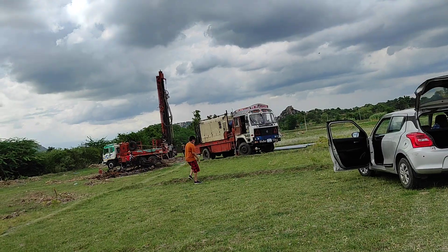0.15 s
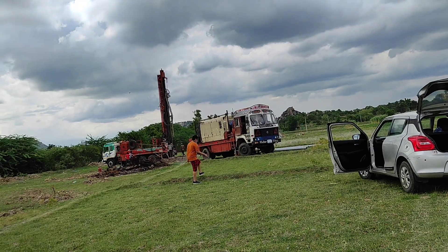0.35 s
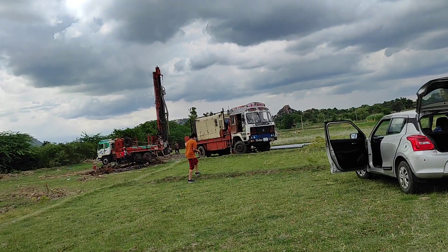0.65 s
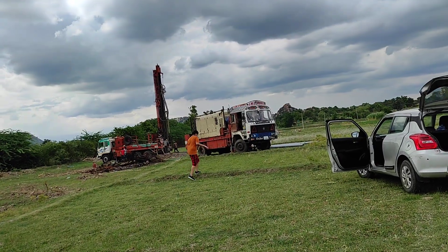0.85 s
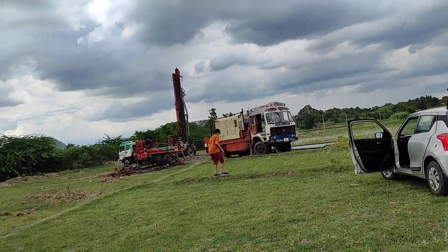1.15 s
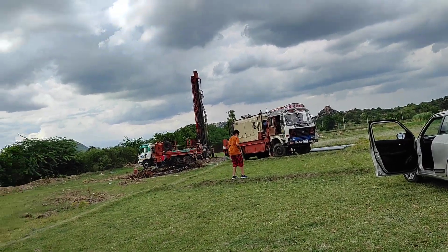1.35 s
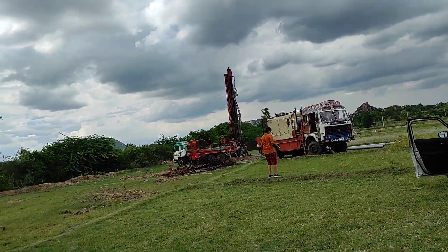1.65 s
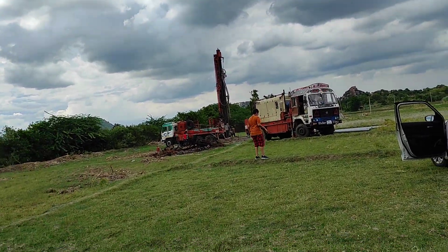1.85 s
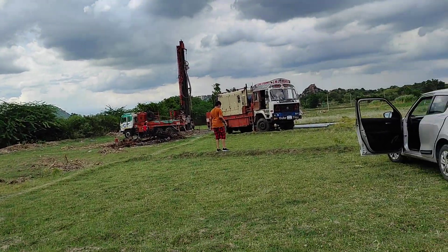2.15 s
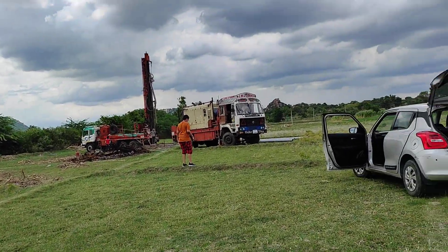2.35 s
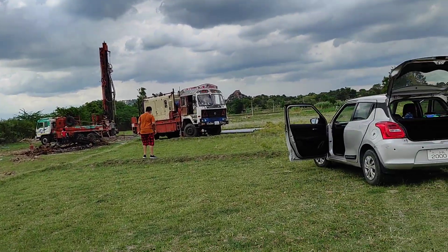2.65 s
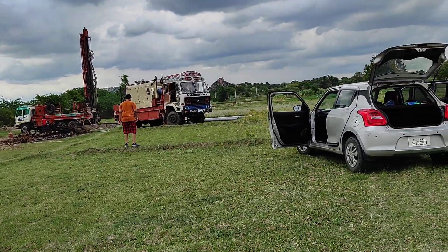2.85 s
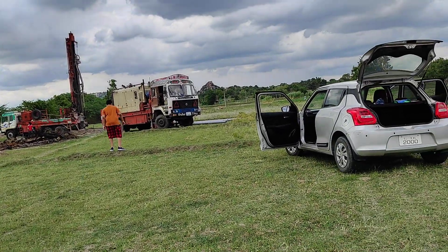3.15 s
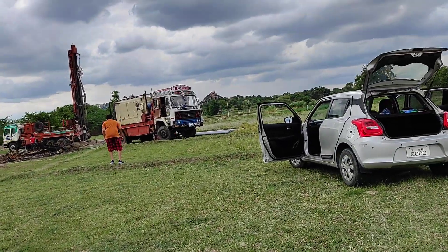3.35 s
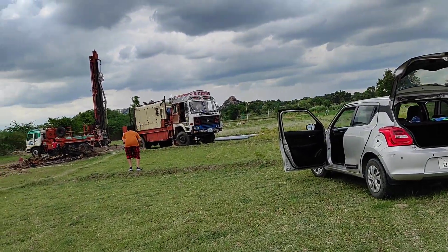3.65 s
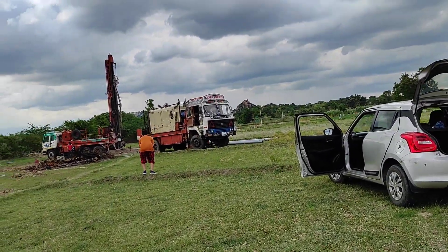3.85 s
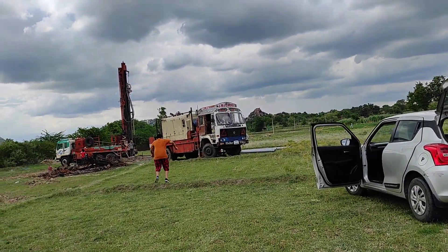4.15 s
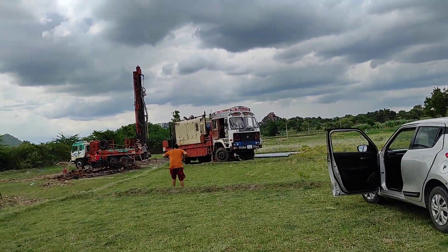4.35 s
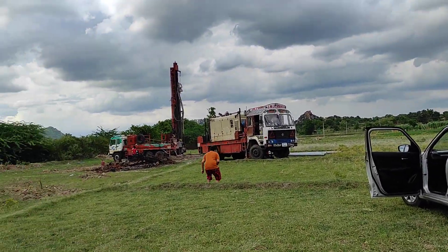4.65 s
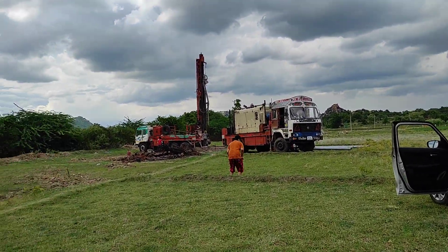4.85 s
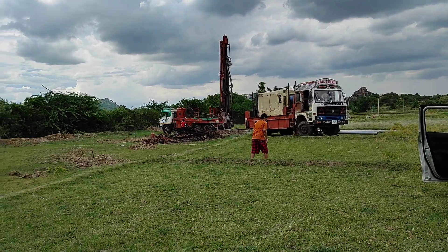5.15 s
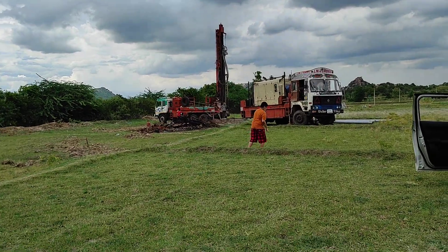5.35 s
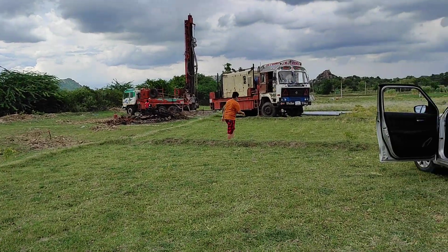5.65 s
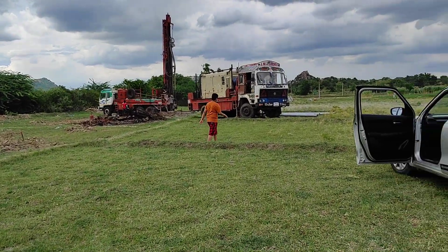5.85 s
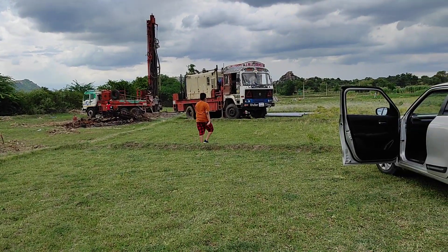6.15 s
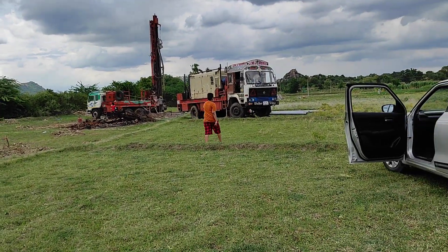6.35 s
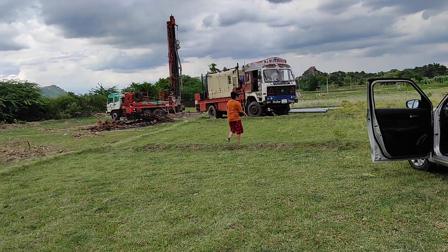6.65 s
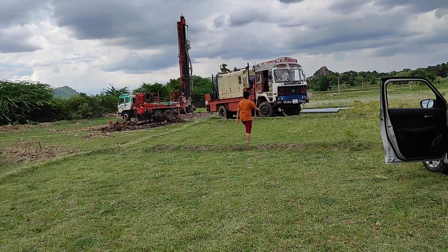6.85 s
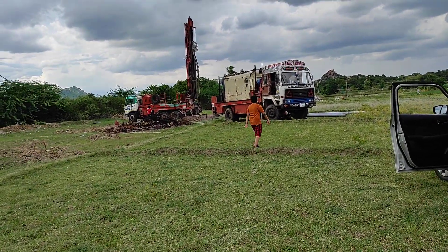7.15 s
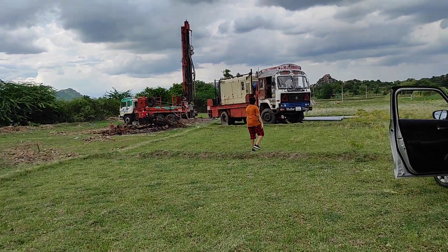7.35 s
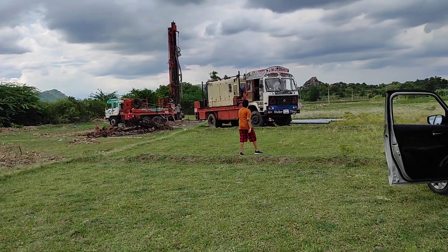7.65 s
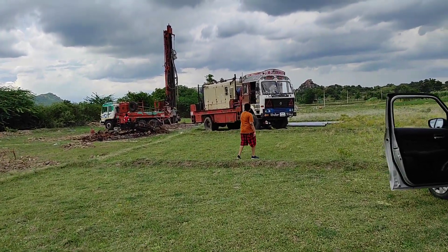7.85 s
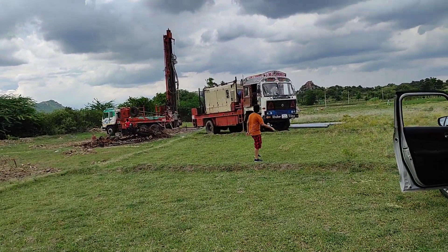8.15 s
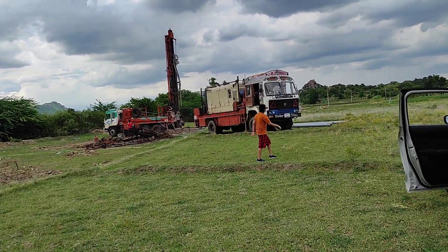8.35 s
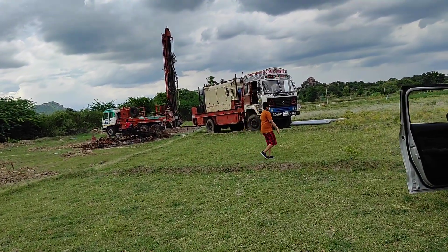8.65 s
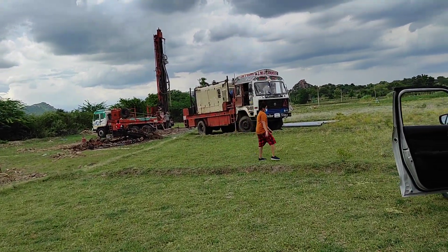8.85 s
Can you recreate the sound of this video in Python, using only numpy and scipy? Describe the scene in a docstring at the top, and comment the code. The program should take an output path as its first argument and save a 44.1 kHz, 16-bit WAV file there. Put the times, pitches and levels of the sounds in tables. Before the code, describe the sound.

Outdoors in an open field, a drilling rig and compressor truck run continuously some distance away: a deep steady diesel hum, broad machine roar, faint gear whines and high escaping-air hiss. Wind thumps and flutters on the handheld stereo microphone, light at first, heaviest from about two to five seconds, then easing. The rig shifts slightly between the ears as the camera turns.

```python
"""Well-drilling rig across a windy field

A well-drilling rig and its compressor truck run flat out, heard from a hand-held camera with two microphone ports.
Engines are sums of sine waves, and the turbo whine is one wandering sine at each port.
Machine roar, gear whines, escaping air and wind are noise shaped in frequency and moved in level.
The rig swings between the ears as the camera turns, and gusts buffet the two ports."""
import sys
import numpy as np
from scipy import signal
from scipy.fft import rfft, irfft, next_fast_len
from scipy.io import wavfile
from scipy.ndimage import uniform_filter1d, minimum_filter1d

SR = 44100
rng = np.random.default_rng(int(sys.argv[2]) if len(sys.argv) > 2 else 0)


def digitize_waveform(pressure):
    """Quantize a signal to 16-bit integers and store it at the path in sys.argv[1].

    Rows of a 2-D input are taken as channels; values are limited to [-1, 1].
    """
    field = np.atleast_2d(pressure).T
    bounded = np.clip(field, -1, 1)
    quanta = np.round(bounded * 32767).astype(np.int16)
    wavfile.write(sys.argv[1], SR, quanta)


N = 397782
TIME = np.arange(N) / SR  # seconds
SECOND_FIRING_HZ = 139.96
PORT_SPACING_M = 0.11
SOUND_M_PER_S = 343
EDGE_HZ = 14200  # upper limit of the whole sound

# Wind. Spectrum levels are relative: each noise is set to rms 1 afterwards.
# the breeze rises and drops; the right port lies mostly in the lee: (t/s, left level/dB, right level/dB)
BREEZE_LEVEL = [(0, -20, -25), (.95, -11.5, -17), (1.3, -9, -13), (1.7, -16, -17), (1.95, -2.5, -13),
                (2.5, -4.5, -17), (2.75, -2.5, -8), (3.7, 0, -2.5), (4.35, -1.5, -4), (4.7, -4, -13),
                (5.1, -4, -12), (5.62, -0.5, -9), (6.05, -6, -12), (6.55, -7, -13), (6.95, -12, -17),
                (7.3, -9, -17), (7.85, -5.5, -16), (8.35, -15, -18), (9.02, -12, -17)]
# single gusts and lulls on top of the breeze:
# (peak t/s, length/s, rumble lift/dB, left buffeting lift/dB, right buffeting lift/dB)
GUST_SWELLS = [(0.454,0.071,9,0,0), (0.75,0.13,13.5,-5,-3), (1.406,0.099,9,-6,-6), (1.878,.09,7,-5,-2),
               (2.34,0.054,6.5,9.5,4), (2.41,0.052,7,7,0), (2.614,0.085,11,12,3), (2.71,.05,2,2,13),
               (3.007,.048,11,12,3), (3.21,0.14,9,4,9), (3.371,0.052,-2,13.5,3), (3.44,0.073,2,10,16.5),
               (3.652,.06,3,8,3), (3.72,0.05,2,10,-2), (3.798,0.065,-2,-11,-3), (4.035,0.066,5,11,6),
               (4.222,0.097,4.5,6,-3), (4.368,0.067,6,9.5,16), (4.456,.06,-1,5,12), (4.501,0.074,6,13,3),
               (4.59,.06,-2,-8,0), (4.654,0.052,8,15,3), (4.777,0.07,12,8,9), (4.88,0.13,6,5,5),
               (5.636,.06,-11,5,5), (5.96,0.25,5.5,9.5,6), (6.197,0.031,9,19,5), (6.33,.08,5,2,0),
               (6.484,.05,6,5,2), (6.565,0.11,8,3,2), (7.087,0.1,11,-6,-4), (7.286,0.09,6,12,5),
               (7.885,.088,6,8,2), (8.215,.08,10,6,2), (8.51,.12,5,4,2)]
# slow eddies on the ports: (f/Hz, level per Hz/dB)
RUMBLE_SPECTRUM = [(5, -1), (20, 0), (48, 1), (75, 2.5), (110, -3), (160, -1.5), (230, -6.5), (320, -14.5),
                   (600, -32), (1500, -80)]
# harder gusts tearing at the ports: (f/Hz, level per Hz/dB)
BUFFET_SPECTRUM = [(40, -20), (110, -8), (165, 5.5), (250, 1), (380, -5), (550, -14), (900, -28),
                   (2000, -33), (6000, -69)]
# the hardest gusts rasping on the rim of the port: (f/Hz, level per Hz/dB)
RASP_SPECTRUM = [(150, -25), (330, 1.5), (450, 2.5), (600, -4), (900, -12.5), (2500, -26.5), (6000, -61)]

# The way from the rig to the ports.
# how well the air carries the rig's noise; each sound follows a share of it: (t/s, full swing/dB)
AIR_CARRY = [(0, -0.3), (.7, -6), (.95, -0.5), (1.65, -3), (2.3, -1.5), (2.6, 1), (3.35, 1), (3.8, 1),
             (4.1, -3), (4.58, -1), (4.8, 4), (4.98, -0.8), (5.6, 1), (6.2, 0.5), (7.1, 2), (7.55, 1),
             (8.3, 4), (9.02, 2.5)]
# the side of a parked car throws the midrange back: (t/s, level/dB)
CAR_ECHO_LEVEL = [(0, 4.5), (2.3, -2.5), (2.8, 3.5), (3.4, 6.5), (3.8, -1), (4.1, 0.5), (9.02, -1)]
# the camera pans to and fro: (t/s, bearing of the rig/degrees, positive toward the left port)
RIG_BEARING = [(0, 1), (.22, -2.5), (.5, 3), (.95, -5), (1.23, -3.5), (1.42, 4), (1.54, 17), (1.61, 18.5),
               (2.12, 7.5), (2.38, -5), (2.52, -1), (2.65, -8.5), (3.29, -22), (3.58, -12.5), (3.69, -12.5),
               (4.06, -6.5), (4.55, -9), (5.05, 16), (5.45, 11.5), (5.74, 4), (5.9, -4), (6.12, -5),
               (6.54, -4.5), (6.8, 3.5), (6.98, 6.5), (7.4, 2.5), (7.57, 4), (7.77, -0.5), (8.16, 0),
               (8.38, 1.5), (8.51, 7), (9.02, -1.5)]
# colour of the left port against the right: (f/Hz, level/dB)
LEFT_OVER_RIGHT = [(100, 5.5), (440, 3.5), (600, 1.5), (780, 3.5), (1000, 7), (1200, 1.5), (1580, 5),
                   (1900, 2), (2500, 2), (3100, -10), (3500, -2.5), (5900, 1), (7100, -12.5), (8300, 6.5),
                   (9500, 11), (10700, -0.5)]
# how the ports differ: (f/Hz, left-right likeness from 0 to 1, phase by which left leads/radians)
PORT_LIKENESS = [(820, .98, -0.14), (1110, 1, -0.87), (1320, 0.95, 0.16), (1670, 0.78, -1.18),
                 (1960, 1, -0.54), (2580, 0.93, -1.5), (2880, 0.05, -0.44), (3050, 0.05, 0),
                 (3260, 0.3, 1.8), (3520, 0.91, 0.71), (4200, 0.94, 0.43), (5040, 0.83, -0.27),
                 (5700, 0.56, -0.16), (6470, 0.54, -0.93), (6930, 0, -0.056), (7540, .58, 1.5),
                 (8040, 0.54, 1), (8700, 0.4, -0.16), (9400, 0.3, -.5), (10000, 0.3, -.5)]
# roar and hiss dip briefly at the left port while the wind is strongest: (t/s, length/s, level/dB)
LEFT_DIPS = [(3.49, 0.12, -4), (3.793, 0.15, -4), (4.02, 0.2, -5), (4.3, .35, -1.3), (4.57, 0.12, -4.5)]
# as the camera turns, a band of the hiss swells at the left port: (t/s, length/s, f/Hz, half-width/Hz, level/dB)
LEFT_SWELLS = [(.94, 0.17, 3680, 600, 8), (3.05, 0.92, 7300, 450, 2), (4.82, 0.18, 6100, 800, 5.5),
               (5.1, 0.2, 6500, 500, 8), (6.5, .7, 3250, 300, 4)]
# the body behind the camera throws sound back as the arms move: (t/s, left delay/ms, right delay/ms)
BODY_DELAYS = [(0,1.08,1.37), (.6,1.12,1.38), (1.05,1.25,1.28), (1.4,1.24,1.48), (2.3,1.12,1.37),
               (2.9,1.38,1.45), (3.8,1.52,1.5), (4.5,1.22,1.21), (5.5,1.17,1.09), (5.9,1.07,1.06),
               (6.7,1.54,1.26), (7.1,1.18,1.37), (7.85,1.44,1.43), (9.02,1.5,1.49)]
# strength of that echo against the direct sound: (f/Hz, level/dB)
BODY_ECHO_LEVEL = [(300, -36), (1000, -20), (2000, -15), (3100, -10), (4000, -14), (5500, -19), (9000, -25)]

# The rig and its truck.
# compressed air, relative: (f/Hz, level per Hz/dB)
HISS_SPECTRUM = [(3100, -12), (3450, -2.5), (3800, -4.5), (4200, -3.5), (4650, -6), (5900, -1.5),
                 (6850, -4.5), (7600, 1.5), (8300, 0.6), (9100, -7), (9700, -12.5), (10300, -25.5),
                 (11200, -32), (14000, -36)]
# fans, engine blocks and compressor, relative: (f/Hz, level per Hz/dB)
ROAR_SPECTRUM = [(60, -6), (125, -4), (170, 0.5), (220, 3.5), (290, -6.5), (340, -11), (480, -15.5),
                 (560, -7.5), (650, -11), (780, -6), (1030, -17), (1350, -17), (2000, -21.5), (3000, -26)]
# turbocharger tone before its small wander: (t/s, f/Hz)
TURBO_PITCH = [(0, 10735), (1.9, 10705), (2.5, 10660), (3.1, 10690), (4.6, 10665), (6.5, 10675),
               (7.6, 10700), (9.02, 10680)]
# gears and pumps, levels relative to each other: (f/Hz, half-width/Hz, level/dB)
WHINE_BANDS = [(840, 10, -48), (1122, 6, -53), (1335, 8, -49), (1420, 10, -56), (1577, 6, -56),
               (1642, 7, -52), (1945, 10, -59), (2510, 18, -60), (2662, 14, -63)]
# second engine's tones before they waver: (multiple of its firing rate, level/dB)
SECOND_LINES = [(1, -33), (2, -43.5), (3, -48), (4, -48.5)]
# main diesel's firing rate: (t/s, f/Hz)
MAIN_FIRING = [(0, 98.59), (0.7, 98.84), (1.3, 98.9), (2, 98.69), (2.7, 98.49), (3.5, 98.61), (4.5, 98.47),
               (5.5, 98.35), (7, 98.31), (8.2, 98.24), (9, 98.29)]
# main diesel's exhaust tones before they waver; six firings make one cycle, and unequal cylinders
# fill the gaps between the firing tones: (multiple of the cycle rate, level/dB)
MAIN_LINES = [(6, -23), (9, -36), (11, -33.5), (12, -30), (14, -51), (15, -50.5), (16, -37), (17, -53),
              (18, -34), (20, -55), (24, -42), (26, -47), (44, -45.5), (47, -46.5), (55, -53.5)]
# change of the firing hum, lowest near the strongest wind: (t/s, level/dB)
HUM_LEVEL = [(0, 0), (.6, -3), (1.2, -2.5), (1.7, -0.5), (2.3, -2), (2.85, 0), (3.4, -2), (3.9, -6.5),
             (4.5, -1.5), (5.05, -1.5), (5.8, 0), (6.7, 0), (7.3, 0.5), (7.85, 0.5), (9.02, 1)]


def gain_of(db):
    """Turns decibels into an amplitude factor."""
    return 10 ** (np.asarray(db) / 20)


def evened(x):
    """Scales each channel to rms 1."""
    return x / np.sqrt(np.mean(x ** 2, axis=-1, keepdims=True) + 1e-20)


def bell(x, centre, width):
    """A smooth bump of height 1, down to about a third at one width from the centre."""
    return np.exp(-((x - centre) / width) ** 2)


def curve(rows, t=TIME):
    """The columns of a time table, joined by straight lines."""
    s, *columns = np.transpose(rows)
    return np.array([np.interp(t, s, c) for c in columns])


def read(rows, hz):
    """The columns of a frequency table, joined along a logarithmic frequency axis."""
    f, *columns = np.transpose(rows)
    return np.array([np.interp(np.log(hz + 1), np.log(f + 1), c) for c in columns])


def noise(gain):
    """Noise of rms 1 whose amplitude spectrum is gain(Hz)."""
    size = next_fast_len(N)
    spectrum = rfft(rng.standard_normal(size)) * gain(np.fft.rfftfreq(size, 1 / SR))
    return evened(irfft(spectrum, size)[:N])


def drift(hz):
    """A slow random curve of rms 1, with up to about hz changes a second."""
    t = np.arange(0, TIME[-1] + 1, 1 / 500)
    keep_slow = np.exp(-(np.fft.rfftfreq(len(t), t[1]) / hz) ** 2)
    slow = irfft(rfft(rng.standard_normal(len(t))) * keep_slow, len(t))
    return np.interp(TIME, t, evened(slow))


def coloured(spectrum, low_hz=1, high_hz=SR):
    """Noise of rms 1 with a tabled spectrum, between two steep edges."""
    def gain(f):
        edges = (1 + (low_hz / (f + 1)) ** 20) * (1 + (f / high_hz) ** 20)
        return gain_of(read(spectrum, f)[0]) / np.sqrt(edges)
    return noise(gain)


def to_bands(sound):
    """Splits sound into short overlapping slices of spectrum: frequencies, times, values."""
    return signal.stft(sound, SR, nperseg=1024, noverlap=768)


def from_bands(z):
    """Joins the slices of spectrum back into sound."""
    return signal.istft(z, SR, nperseg=1024, noverlap=768)[1][..., :N]


def eddies(spectrum, lumpy_db):
    """Lumpy turbulence of rms 1, unrelated at the two ports."""
    return evened(np.array([coloured(spectrum) * gain_of(lumpy_db * drift(8.4)) for _ in range(2)]))


def wind(rumble_db, buffet_db, buffet_follow, buffet_lee_db, lee_share, rasp_db, rasp_follow):
    """Turbulence at the ports grows with the breeze; gusts and lulls change its level in short bumps."""
    breeze = curve(BREEZE_LEVEL)
    rumble = rumble_db + breeze
    buffet = buffet_db + buffet_follow * breeze + np.array([[0], [buffet_lee_db]])
    for peak, length, rumble_lift, left_lift, right_lift in GUST_SWELLS:
        swell = bell(TIME, peak, length / 2)
        rumble = rumble + rumble_lift * swell * np.array([[1], [lee_share]])
        buffet = buffet + swell * np.array([[left_lift], [right_lift]])
    rasp = rasp_db + rasp_follow * (buffet - buffet_db)
    slow_air = gain_of(rumble) * eddies(RUMBLE_SPECTRUM, lumpy_db=2.15)
    torn_air = gain_of(buffet) * eddies(BUFFET_SPECTRUM, lumpy_db=1.5)
    return slow_air + torn_air + gain_of(rasp) * eddies(RASP_SPECTRUM, lumpy_db=-0.9)


def carried(follow, flicker_db):
    """Gain of a sound that crossed the field: it follows the carrying air and flickers by chance."""
    return gain_of(follow * curve(AIR_CARRY)[0] + flicker_db * drift(2.4))


def air_path(sound, patchy_db, echo_hz, echo_width_hz):
    """Moving air lifts and dims patches of the spectrum; the car's echo changes the midrange."""
    hz, t, z = to_bands(sound)
    hz = hz[:, None]
    patches = rng.standard_normal(z.shape[1:])
    for _ in range(2):  # smooth across frequency, then time
        patches = uniform_filter1d(uniform_filter1d(patches, size=5, axis=0), size=45, axis=1)
    depth = patchy_db * hz / (hz + 1800)  # long waves are hardly disturbed
    echo = bell(hz, echo_hz, echo_width_hz) * curve(CAR_ECHO_LEVEL, t)
    return from_bands(z * gain_of(depth * patches / patches.std() + echo))


def ports(direct, scattered):
    """Two ports hear the rig, each with its own colour and delay; scattered sound makes them differ."""
    hz, t, (a, b) = to_bands(np.array([direct, scattered]))
    same, phase = read(PORT_LIKENESS, hz)[:, :, None]
    same = np.clip(same, 0, 1)
    lead_s = PORT_SPACING_M / SOUND_M_PER_S * np.sin(np.radians(curve(RIG_BEARING, t)))
    turn = phase + 2 * np.pi * hz[:, None] * lead_s
    # each port gets half of the difference in level and phase
    half = gain_of(read(LEFT_OVER_RIGHT, hz).T / 2) * np.exp(.5j * turn)
    left = a * half
    right = (same * a + np.sqrt(1 - same ** 2) * b) / half
    return from_bands(np.array([left, right]))


def left_changes(pair):
    """Brief dips of level and swells of single bands, at the left port only."""
    hz, t, z = to_bands(pair[0])
    change = sum(db * bell(t, s, length / 2) for s, length, db in LEFT_DIPS)
    for s, length, f, width, db in LEFT_SWELLS:
        change = change + db * bell(t, s, length / 2) * bell(hz[:, None], f, width)
    return np.array([from_bands(z * gain_of(change)), pair[1]])


def body_echo(pair):
    """A close reflection cuts a comb of hollows at each port, which sweeps as its delay changes."""
    hz, t, z = to_bands(pair)
    delay_s = curve(BODY_DELAYS, t)[:, None] / 1000
    strength = gain_of(read(BODY_ECHO_LEVEL, hz).T)
    echo = strength * np.exp(-2j * np.pi * hz[:, None] * delay_s)
    return from_bands(z * (1 + echo) / np.sqrt(1 + strength ** 2))


def hiss(cycles, left_db, right_db, flutter_db, firing_depth):
    """Escaping air is high noise that flutters by chance and pulses slightly with the firings."""
    firing = 1 + firing_depth * np.cos(12 * np.pi * cycles)  # six firings a cycle
    flutter = gain_of(flutter_db * drift(14.6)) * firing
    sound = np.array([flutter * coloured(HISS_SPECTRUM, low_hz=2920) for _ in range(2)])
    sound = ports(*air_path(sound, patchy_db=1.5, echo_hz=1480, echo_width_hz=270))
    return evened(sound) * gain_of([[left_db], [right_db]]) * carried(follow=0.33, flicker_db=0.0)


def roar(cycles, level_db, firing_depth, throb_hz, throb_depth):
    """Machine noise swells at each firing and throbs with the drill; its bass varies less on the way."""
    throb = np.cos(2 * np.pi * np.cumsum(throb_hz * (1 + 0.0067 * drift(3.3))) / SR)
    beat = 1 + firing_depth * np.cos(12 * np.pi * cycles) + throb_depth * throb
    sound = np.array([beat * coloured(ROAR_SPECTRUM, low_hz=25, high_hz=2960) for _ in range(2)])
    sound = ports(*air_path(sound, patchy_db=2.0, echo_hz=1475, echo_width_hz=145))
    bass = signal.sosfiltfilt(signal.butter(2, 420, fs=SR, output="sos"), sound)
    carried_bass = bass * carried(follow=0.12, flicker_db=0.5)
    carried_rest = (sound - bass) * carried(follow=0.39, flicker_db=0.7)
    return gain_of(level_db) * (carried_bass + carried_rest)


def turbo(level_db, wander_hz, fade_db):
    """One thin blade tone wanders in pitch; its fading and phase jitter differ at each port."""
    turns = np.cumsum(curve(TURBO_PITCH)[0] + wander_hz * drift(4.9)) / SR

    def at_port():
        fade = gain_of(level_db + fade_db * drift(8.6))
        return fade * np.sin(2 * np.pi * turns + 2.0 * drift(27))
    return np.array([at_port() for _ in range(2)])


def whines(level_db):
    """Gears and pumps give narrow, fuzzy tones: noise squeezed into slim bands."""
    def peaks(f):
        return sum(gain_of(db) / np.sqrt(width) * bell(f, hz, width) for hz, width, db in WHINE_BANDS)
    return gain_of(level_db) * noise(peaks)


def engine(turns, lines, waver_db, wobble):
    """Exhaust tones at multiples of one rate; moving air makes the higher ones fade and wobble more."""
    out = np.zeros(N)
    for k, db in lines:
        height = np.sqrt(k / lines[0][0])
        phase = 2 * np.pi * round(k) * turns + wobble * height * drift(5.5)  # wobble in radians
        level = gain_of(db + waver_db * height * drift(3.9))
        out += level * np.sqrt(2) * np.sin(phase)
    return out


def scene():
    """Wind, air, machine noise, turbo, whines and both engines, added together."""
    cycles = np.cumsum(curve(MAIN_FIRING)[0] / 6) / SR
    second = np.cumsum(SECOND_FIRING_HZ * (1 + 0.00224 * drift(0.95))) / SR
    gusts = wind(rumble_db=-16.0, buffet_db=-21.5, buffet_follow=1.0, buffet_lee_db=-4.5,
                 lee_share=0.59, rasp_db=-36.5, rasp_follow=1.52)
    air = hiss(cycles, left_db=-30.0, right_db=-31.5, flutter_db=0.75, firing_depth=.015)
    machines = roar(cycles, level_db=-22.5, firing_depth=0.019, throb_hz=37.1, throb_depth=0.043)
    whistle = turbo(level_db=-54, wander_hz=12, fade_db=4.5)
    drone = engine(second, SECOND_LINES, waver_db=2.0, wobble=0.14)
    drone = drone + engine(cycles, MAIN_LINES[1:], waver_db=0.85, wobble=0.072)
    drone = drone * carried(follow=0.25, flicker_db=1.04)
    hum = engine(cycles, MAIN_LINES[:1], waver_db=-0.7, wobble=0.074) * gain_of(curve(HUM_LEVEL)[0])
    tones = ports(hum + drone + whines(level_db=-44.0), scattered=whines(level_db=-36.0))
    return gusts + body_echo(left_changes(machines + air)) + whistle + tones


def record(dry):
    """A limiter turns each port down around its loudest peaks; then a filter removes the top treble."""
    peak_db = 20 * np.log10(abs(dry) + 1e-6)
    recovery = 90 * TIME  # dB, at 90 dB a second
    held_db = np.maximum.accumulate(peak_db + recovery, axis=1) - recovery
    ceiling_db = -2.5
    duck_db = minimum_filter1d(np.minimum(ceiling_db - held_db, 0), size=129, axis=1)
    limited = dry * gain_of(uniform_filter1d(duck_db, size=129, axis=1))
    band_limit = signal.firwin(511, EDGE_HZ, window=("kaiser", 9), fs=SR)
    return signal.oaconvolve(limited, band_limit[None], "same")


dry = scene()
out = record(dry)
digitize_waveform(out)
```